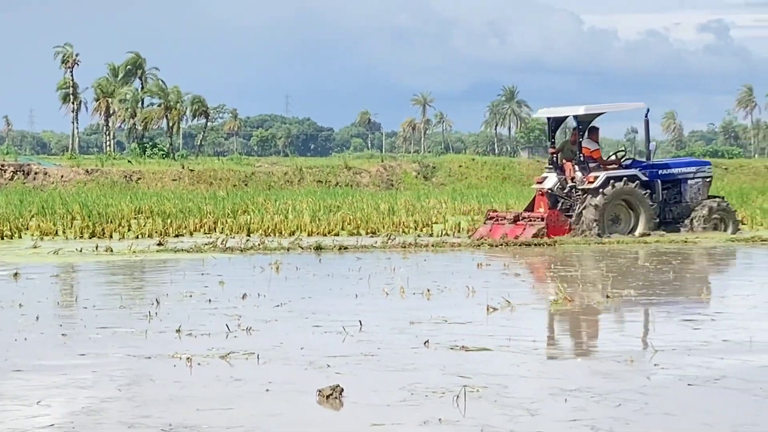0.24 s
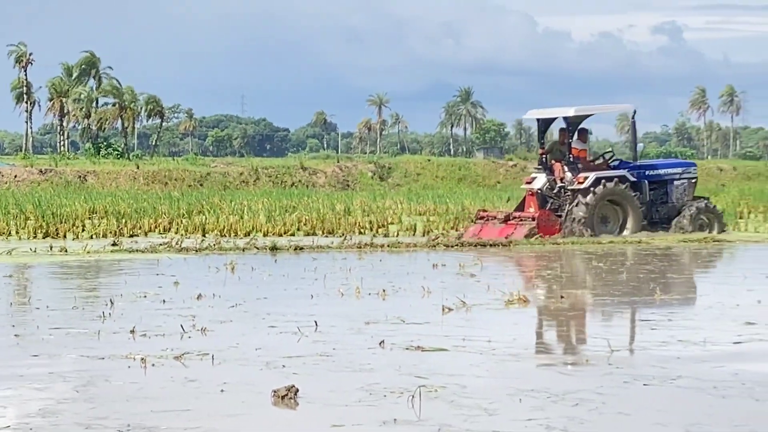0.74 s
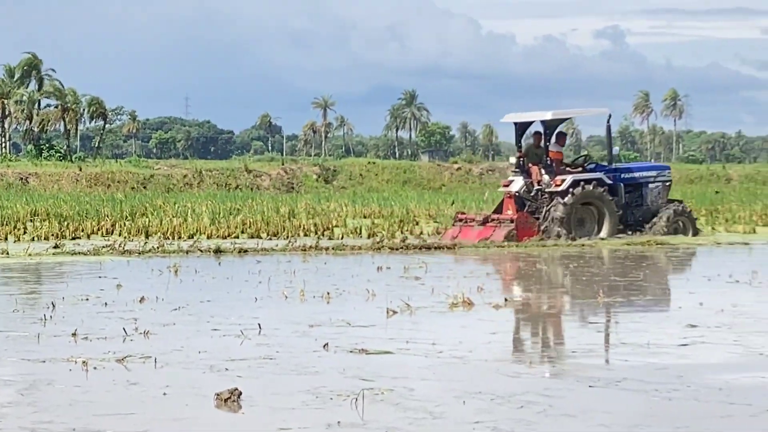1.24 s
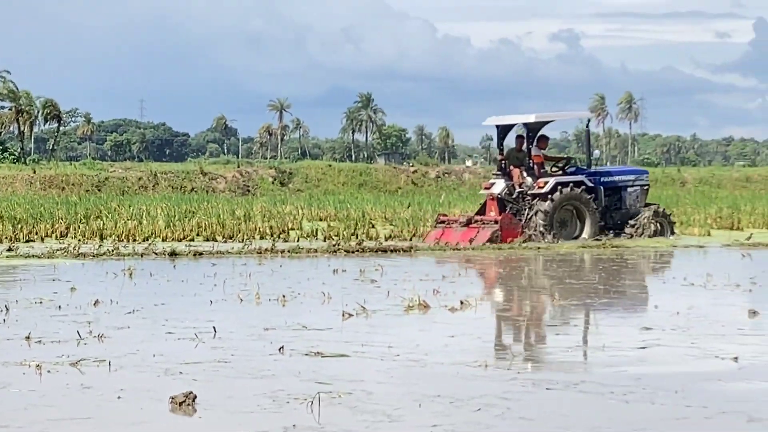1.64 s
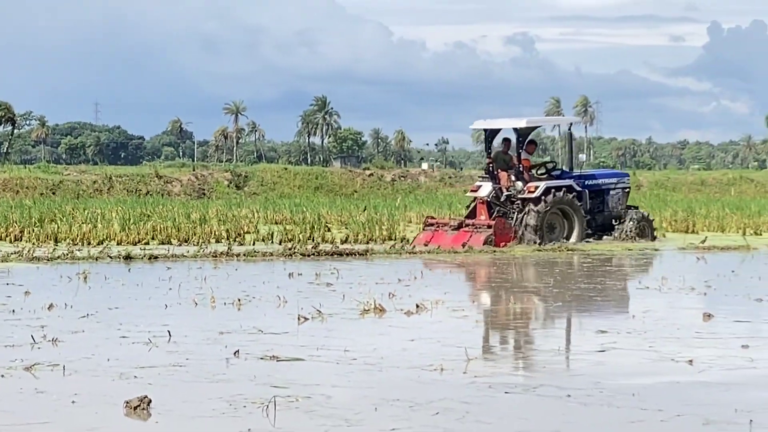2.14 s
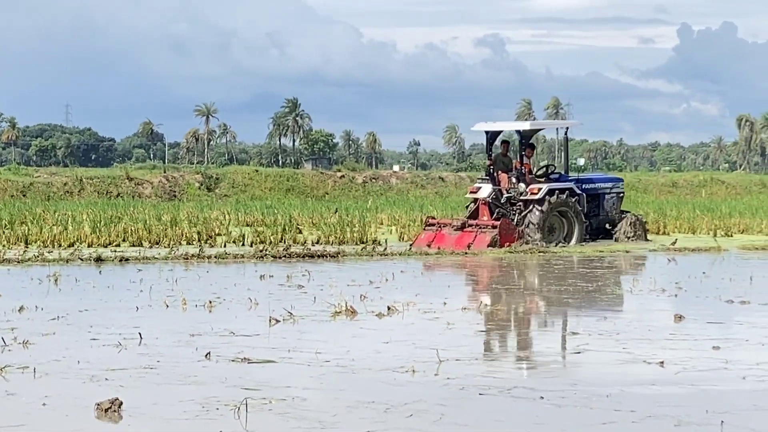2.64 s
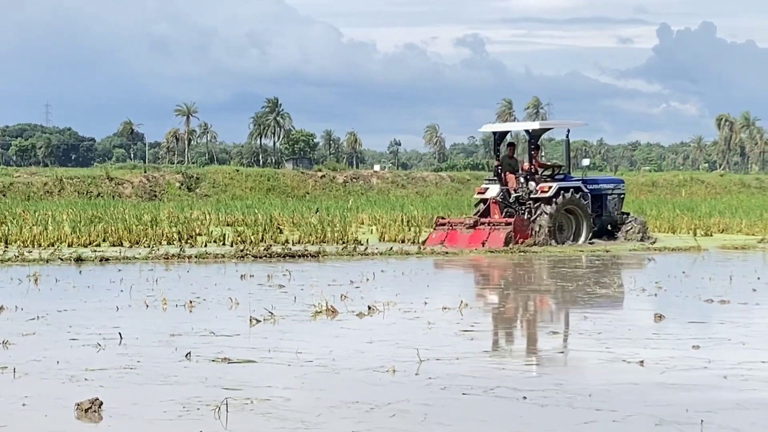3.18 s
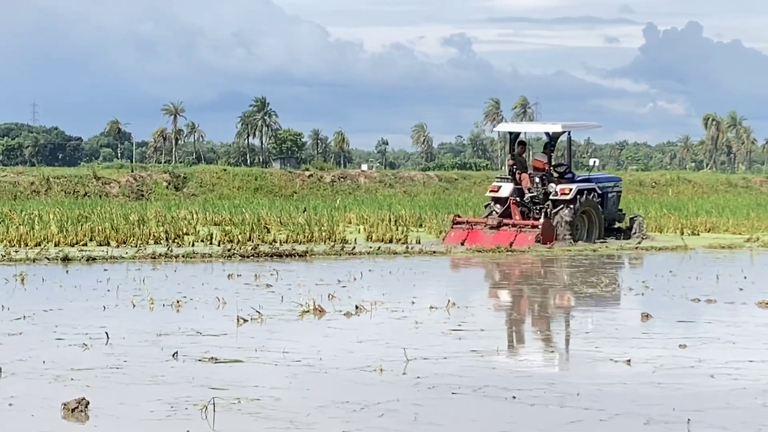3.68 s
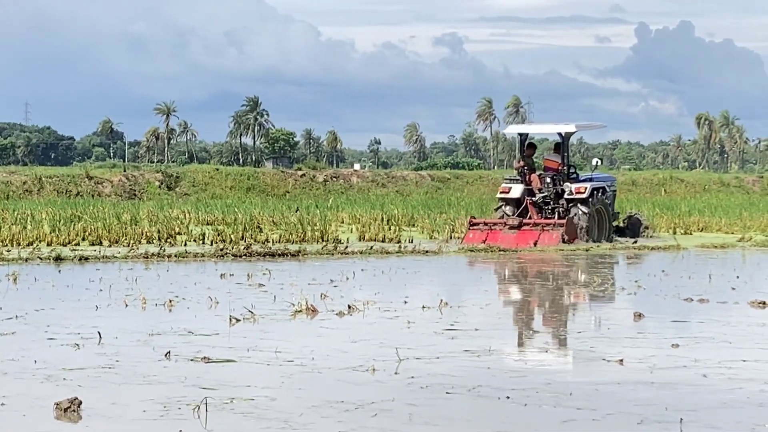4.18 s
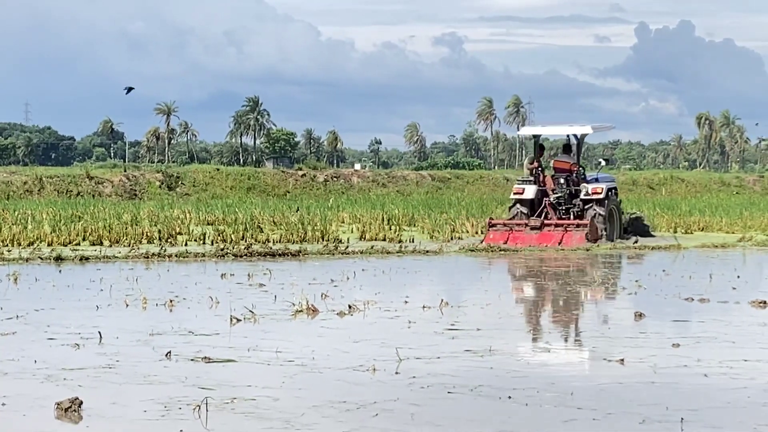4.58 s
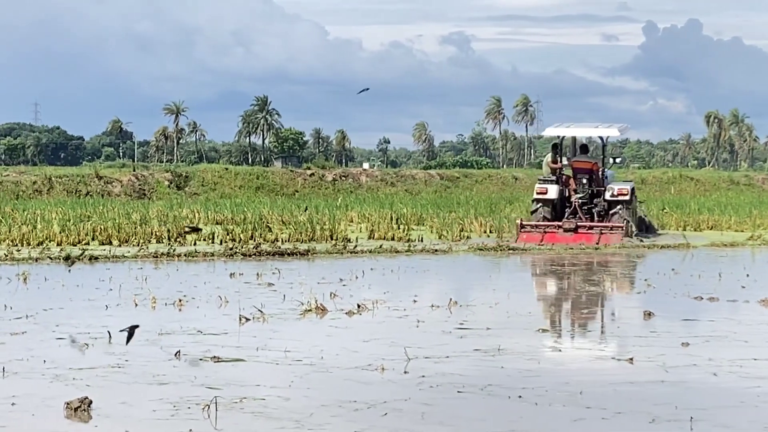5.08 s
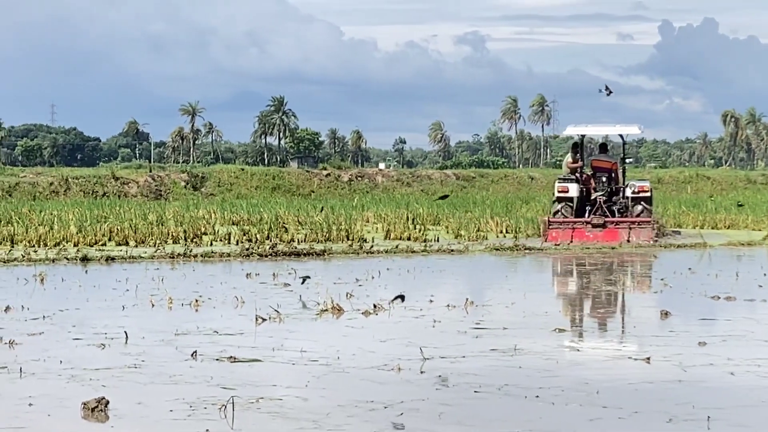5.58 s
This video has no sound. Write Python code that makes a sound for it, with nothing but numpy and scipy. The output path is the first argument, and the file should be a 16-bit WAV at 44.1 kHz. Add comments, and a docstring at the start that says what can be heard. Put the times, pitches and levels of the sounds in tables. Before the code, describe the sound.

A diesel tractor works some way off in a flooded field, with a low, even drone and rapid clatter. Its tiller clanks lightly now and then over a faint hiss of thrown water and mud. A bird gives six short whistles in the first half. A high, pulsing cricket rasp grows louder, then stops near the end. The engine fades slightly as it turns away, heard outdoors through a hand-held stereo microphone.

```python
"""Tractor tilling a flooded field.

A three-cylinder diesel works some way off and turns slowly away. Its exhaust drones on the firing
rate, the block clatters with each firing, the tiller clanks and throws mud and water.
A bird whistles six times; a bush cricket rasps its wings ever louder, then stops.
Heard through two microphone ports on a hand-held device."""
import sys
import numpy as np
from scipy import signal
from scipy.fft import rfft, irfft
from scipy.io import wavfile
from scipy.ndimage import uniform_filter1d

SR = 44100
rng = np.random.default_rng(int(sys.argv[2]) if len(sys.argv) > 2 else 0)


def transcribe(u):
    """Save the signal u as a 16-bit wav file named by the first command-line argument.

    u: samples, shape (n,) or (channels, n), limited to [-1, 1]; the rate is SR.
    q: integer samples, one column per channel.
    """
    v = np.clip(np.atleast_2d(u).T, -1, 1)
    q = np.round(v * 32767).astype(np.int16)
    wavfile.write(sys.argv[1], SR, q)


N = 256662
T = np.arange(N) / SR
HZ = np.maximum(np.arange(N // 2 + 1) * SR / N, 1)


# engine speed: time_s, cycles_per_s
ENGINE_SPEED = [(0.0, 16.108), (0.39, 16.108), (0.78, 16.103), (1.16, 16.103), (1.55, 16.027),
                (1.94, 16.12), (2.33, 16.108), (2.72, 15.968), (3.1, 16.102), (3.49, 16.203),
                (3.88, 16.148), (4.27, 16.028), (4.66, 16.164), (5.04, 15.942), (5.43, 16.013),
                (5.82, 16.015)]

def engine_cycles(first_firing_s=.0127):
    """Running count of four-stroke cycles: two crank turns and three firings each."""
    cycles_per_s, = in_time(ENGINE_SPEED)
    return np.cumsum(cycles_per_s) / SR - first_firing_s * cycles_per_s[0] + 1


# firing orders 1-3: broadside_db, fade_factor
MAIN_ORDERS = [(-27.5, 1.65), (-20.5, 0.96), (-23, .7)]
# firing orders 1-4: wander_db
ORDER_WANDER_DB = [0.88, 0.55, 0.85, 0.71]
# weak exhaust tones: cycle_rate_multiple, level_db (re firing order 2)
MINOR_ORDERS = [(5, -24), (10, -17.5), (11, -18), (15, -23.5), (15.75, -22.5), (18, -27), (21, -20),
                (25, -22.5), (27, -23)]

def exhaust(cycle, fade_db, fourth_db, silencer_lead_rad=1.2):
    """Firing orders add in step to uneven puffs that swing in strength and phase once a crank turn."""
    levels_db = [db + factor * fade_db for db, factor in MAIN_ORDERS] + [fourth_db]
    levels_db = [db + wander_db * drift(2.0) for db, wander_db in zip(levels_db, ORDER_WANDER_DB)]
    firing, crank_rad = 3 * cycle, 4 * np.pi * cycle
    strength = np.interp(firing, np.arange(400), rng.standard_normal(400))
    swing = 1 + 0.18 * np.cos(crank_rad)
    out = from_db(levels_db[0] + 0.52 * drift(9.0)) * np.cos(2 * np.pi * firing + silencer_lead_rad)
    for k, db in enumerate(levels_db[1:], 1):
        lead_rad = 0.025 * np.sin(crank_rad) + .05 * k * drift(15.0)
        out += from_db(db + 0.2 * k * strength) * swing * np.cos(2 * np.pi * (k + 1) * firing + lead_rad)
    for multiple, db in MINOR_ORDERS:
        gain = from_db(levels_db[1] + db + 2.55 * drift(3.4))
        out += gain * np.cos(2 * np.pi * multiple * cycle + .5 * drift(3.3) + rng.uniform(0, 2 * np.pi))
    return np.sqrt(2) * out


def knock(cycle, depth, decay_firings):
    """Envelope that jumps unevenly at each combustion and dies back until the next."""
    firing = 3 * cycle + 0.13
    strength = from_db(2.5 * rng.standard_normal(400))[firing.astype(int)]
    envelope = 1 + depth * strength * np.exp(-(firing % 1) / decay_firings)
    return uniform_filter1d(envelope, size=90)


# noise of block, gears and bonnet: freq_hz, density_db
CLATTER_SPECTRUM = [(24, -34), (45, -10), (70, 0), (170, 4.5), (260, -3.5), (400, -1), (600, -3.5),
                    (1050, -3.5), (1600, -8), (2000, -11.5), (2800, -16.5), (3800, -20.5), (4500, -30.5),
                    (6000, -40.5), (16000, -55)]
# cancellation by the reflection off the water: centre_hz, width_hz, depth
WATER_NOTCHES = [(258, 51, 0.5), (733, 40, 0.67), (887, 175, 0.7), (1383, 234, 0.7), (2360, 260, 0.48)]
# bonnet and gearbox panels: centre_hz, width_hz, added_gain
PANEL_MODES = [(260, 9.8, 0.94), (333, 34, 1), (422, 14, 0.19), (490, 40, 0.5), (832, 20, 0.46),
               (990, 25, 0.52), (1060, 18, 0.5), (1230, 96, 0.21), (1540, 60, 0.15), (1690, 74, 0.57),
               (1910, 110, 0.25), (2640, 97, 0.13), (3825, 71, 0.73)]

def clatter(cycle, tilt_db):
    """Block and gear noise, beaten by the firings, ringing in panels, combed by the water's reflection."""
    colour = from_db(at_hz(CLATTER_SPECTRUM))
    for hz, width_hz, depth in WATER_NOTCHES:
        colour *= 1 - depth / (1 + (2 * (HZ - hz) / width_hz) ** 2)
    for hz, width_hz, gain in PANEL_MODES:
        colour *= 1 + gain / (1 + (2 * (HZ - hz) / width_hz) ** 2)
    noise = rng.standard_normal((2, N)) * knock(cycle, depth=0.5, decay_firings=0.21)
    return flicker(spread(noise, colour), together_db=0.23, own_db=1.02, low_hz=164, tilt_db=tilt_db)


# gear whine: time_s, level_db
WHINE_LEVEL = [(0, -47), (2, -48), (3.2, -52), (4, -60), (5.82, -64)]

def gear_whine(mesh_hz=1545):
    """A thin, wavering tone of meshing teeth."""
    db, = in_time(WHINE_LEVEL)
    gain = from_db(db + drift(5.0))
    pitch_hz = mesh_hz + 3.52 * drift(3.07)
    return gain * np.sin(2 * np.pi * np.cumsum(pitch_hz) / SR)


# blades hitting something hard: start_s, level_db
BLADE_HITS = [(0.5644, -32), (1.4994, -35), (2.2598, -38), (4.3544, -37), (4.4164, -33), (4.7054, -32),
              (5.2, -29.5), (5.4104, -30), (5.5024, -34)]
# tiller hood: centre_hz, width_hz, level_db
HOOD_MODES = [(1104, 350, 0.5), (1930, 310, 1), (3140, 950, -2.5)]

def tiller_clanks():
    """Each blade hit rattles briefly through the hood's broad resonances."""
    rings = 0
    for hz, width_hz, db in HOOD_MODES:
        gain = from_db(db + 2 * drift(7.4))
        ring = resonate(rng.standard_normal(N), hz, width_hz)
        rings += gain * unit_rms(resonate(ring, hz, width_hz))
    return from_db(-6) * impacts(BLADE_HITS, attack_s=0.0018) * rings


# thrown water: freq_hz, density_db
SPLASH_SPECTRUM = [(1500, -2), (3000, -4), (4500, 5), (6000, -3), (8000, 3), (10500, 0), (13000, -3),
                   (15100, -7), (15250, -8)]

def splash(cycle, drops_per_s=3000):
    """Dense drops of uneven size over spray hiss; exhaust jet hiss pulses within it."""
    sizes = from_db(3.0 * np.minimum(rng.exponential(1, (2, N)), 5))
    signs = rng.choice([-1, 1], (2, N))
    lands = rng.random((2, N)) < drops_per_s * from_db(2.0 * drift(12.0)) / SR
    drops = .5 * unit_rms(sizes * signs * lands)
    hiss = rng.standard_normal((2, N)) * knock(cycle, depth=1.0, decay_firings=0.12)
    pair = spread(drops + hiss, from_db(at_hz(SPLASH_SPECTRUM)))
    return flicker(pair, together_db=.35, own_db=.75, low_hz=1500)


# clods landing: start_s, level_db
CLODS = [(1.72, -35), (4.7087, -39), (5.6845, -43)]

def mud_splats():
    """Each clod hits the water with a short, bright noise burst."""
    bursts = impacts(CLODS, attack_s=0.0014) * rng.standard_normal(N)
    return band_pass(bursts, 2500, 12000, order=1)


# rising calls: start_s, rise_s, top_hz, level_db, hold_s
RISING_CALLS = [(.87, .045, 3830, -43.5, 0), (1.262, .071, 3860, -43.5, .052), (1.69, .042, 4020, -45, 0)]
# upward glide: time_share, span_share_below_top, gain_db
RISE_SHAPE = [(0, 1, -8), (.35, .45, -2.5), (1, 0, 0)]
# downward flick: time_share, span_share_below_top, gain_db
FLICK_SHAPE = [(.3, .47, -5), (.75, .88, 2), (1, 1, -5)]

def rising_notes(rise_hz=350, flick_s=.026, flick_end_hz=2420):
    """Curves (time_s, pitch_hz, level_db) of calls that rise and flick down; the top may sound on."""
    for start_s, rise_s, top_hz, db, hold_s in RISING_CALLS:
        top_s = start_s + rise_s
        rise = [(start_s + share * rise_s, top_hz - below * rise_hz, db + gain_db)
                for share, below, gain_db in RISE_SHAPE]
        flick = [(top_s + share * flick_s, top_hz - below * (top_hz - flick_end_hz), db + gain_db)
                 for share, below, gain_db in FLICK_SHAPE]
        yield rise + flick
        if hold_s:
            yield [(top_s, top_hz, db - 3.5), (top_s + hold_s, top_hz, db - 7.5)]


# falling whistles: start_s, length_s, settled_hz, level_db, fade_db_per_s
FALLING_CALLS = [(2.254, 0.066, 2820, -37.5, 10), (2.687, .075, 2735, -37, 110),
                 (3.163, .036, 2720, -36, 400)]

def falling_notes(fall_hz=448, fall_s=0.0073, sag_hz_per_s=1100, loudest_s=0.01):
    """Curves of whistles that drop fast, then sag."""
    for start_s, length_s, settled_hz, db, fade_db_per_s in FALLING_CALLS:
        age_s = np.linspace(0, length_s, num=15)
        pitch_hz = settled_hz + fall_hz * np.exp(-age_s / fall_s) - sag_hz_per_s * age_s
        yield np.transpose([start_s + age_s, pitch_hz, db - fade_db_per_s * np.abs(age_s - loudest_s)])


# bird pips: middle_s, length_s, pitch_hz, level_db
PIP_CALLS = [(2.232, .018, 3620, -46), (2.66, .018, 3700, -50), (3.108, .012, 3580, -47),
             (3.123, .012, 4200, -47), (3.13, .016, 5000, -52), (3.135, .01, 3590, -39),
             (3.219, .034, 2645, -39), (4.552, .022, 4500, -51)]

def pip_notes(drop_hz=170, edge_db=-8):
    """Curves of short falling pips, loudest in the middle."""
    for middle_s, length_s, hz, db in PIP_CALLS:
        yield [(middle_s + side * length_s / 2, hz - side * drop_hz / 2, db + abs(side) * edge_db)
               for side in (-1, 0, 1)]


def bird():
    """Gliding near-sines; loud, high notes carry a faint octave; the far bank adds two echoes."""
    song = np.zeros(N)
    for note in [*rising_notes(), *falling_notes(), *pip_notes()]:
        hz, db = in_time(note)
        gate = np.clip(np.minimum(T - note[0][0], note[-1][0] - T) / 0.0015, 0, 1)
        phase_rad = 2 * np.pi * np.cumsum(hz) / SR
        octave_gain = from_db(db + 29) * np.clip((hz - 3500) / 300, 0, 1)
        song += gate * from_db(db) * (np.sin(phase_rad) + octave_gain * np.sin(2 * phase_rad))
    song *= np.sqrt(2) * from_db(2.5 * drift(70.0))
    echoes = from_db(-22) * np.interp(T - .011, T, song) + from_db(-15) * np.interp(T - .027, T, song)
    return song + echoes


# cricket's effort: time_s, level_db
RASP_EFFORT = [(0, -59), (1.6, -55), (2.6, -48.5), (3.9, -42.5), (4.9, -41)]
FULL_EFFORT_DB = -41

def rasps(last_s=4.901, period_s=.1073, drag_s=.005):
    """Rows (end_s, level_db), counted back from the last; the pace drags late, faint rasps are uneven."""
    k = np.arange(45)
    gaps_s = period_s + drag_s * np.exp(-k / 2.5)
    end_s = last_s - np.cumsum(gaps_s) + gaps_s[0]
    db = np.interp(end_s, *np.transpose(RASP_EFFORT))
    scatter_db = 0.11 * (FULL_EFFORT_DB - db) * rng.standard_normal(len(k))
    return np.transpose([end_s, db + scatter_db])


# closing and opening stroke: ring_hz, width_hz, level_db, swell_db_per_s, extra_db_per_effort_db
WING_STROKES = [(9550, 380, 0, 130, .6), (8850, 450, -7.5, 50, -.5)]

def cricket(stroke_hz=140):
    """Alternating strokes ring the wing; each rasp swells and breaks off; effort brightens it."""
    stroke = np.cumsum(stroke_hz * (1 + 0.033 * drift(25.0))) / SR
    out, played = 0, rasps()
    for k, (hz, width_hz, wing_db, swell_db_per_s, effort_slope) in enumerate(WING_STROKES):
        envelope = np.zeros(N)
        for end_s, db in played:
            left_s = end_s + .006 - T
            gate = np.clip(np.minimum(left_s / 0.018, (.105 - left_s) / 0.038), 0, 1)
            top_db = db + effort_slope * (db - FULL_EFFORT_DB)
            envelope += from_db(top_db - swell_db_per_s * left_s.clip(0, 1)) * gate
        contact = np.exp(-(((stroke + k / 2) % 1 - .5) / .15) ** 2)
        ring = resonate(rng.standard_normal(N) * contact, hz, width_hz)
        out += from_db(wing_db) * envelope * unit_rms(band_pass(ring, 8250, 10000, order=3))
    return out


def from_db(db):
    """Decibels to gain."""
    return 10 ** (np.asarray(db) / 20)


def unit_rms(x):
    """Scale to rms 1."""
    return x / np.sqrt(np.mean(x ** 2) + 1e-20)


def in_time(rows):
    """Each column after time_s, one value a sample."""
    time_s, *columns = np.transpose(rows)
    return [np.interp(T, time_s, column) for column in columns]


def at_hz(rows):
    """Rows (freq_hz, value) read at every FFT bin on a log-frequency axis."""
    hz, values = np.transpose(rows)
    return np.interp(np.log(HZ), np.log(hz), values)


def drift(corner_hz):
    """Random wander of rms 1: noise at every 40th sample through a double one-pole low-pass."""
    pole = np.exp(-80 * np.pi * corner_hz / SR)
    slow = signal.lfilter([1], [1, -2 * pole, pole * pole], rng.standard_normal(N // 40 + 2002))[2000:]
    return np.interp(np.arange(N) / 40, np.arange(len(slow)), unit_rms(slow))


def impacts(hits, attack_s, decay_s=0.012):
    """Envelope with a fast rise and an exponential decay for each hit."""
    envelope = np.zeros(N)
    for start_s, db in hits:
        age_s = np.maximum(T - start_s, 0)
        envelope += from_db(db) * np.exp(-age_s / decay_s) * (1 - np.exp(-age_s / attack_s))
    return envelope


def resonate(x, hz, width_hz):
    """Two-pole resonance, peak gain 1."""
    r = np.exp(-np.pi * width_hz / SR)
    feedback = [1, -2 * r * np.cos(2 * np.pi * hz / SR), r * r]
    return signal.lfilter([(1 - r * r) / 2, 0, (r * r - 1) / 2], feedback, x)


def band_pass(x, low_hz, high_hz, order):
    """Flat-topped band filter."""
    return signal.sosfilt(signal.butter(order, [low_hz, high_hz], "band", fs=SR, output="sos"), x)


def flicker(pair, together_db, own_db, low_hz, tilt_db=0):
    """Six octave bands swell together slowly and flicker on their own; tilt_db is per octave."""
    spectrum, octave, swell = rfft(pair), np.log2(HZ / low_hz), drift(2.6)
    out = 0
    for k in range(6):
        band = irfft(spectrum * np.interp(octave, np.arange(6), np.arange(6) == k), N)
        out += band * from_db(together_db * swell + own_db * drift(23.0) + tilt_db * (k - 3))
    return out


# left-right likeness: freq_hz, coherence
PORT_COHERENCE = [(100, 0.94), (450, 1), (690, 0.85), (800, 0.67), (1000, 0.94), (1400, 0.83), (1800, 0.83),
                  (2400, 0.55), (4000, 0.78), (5300, 0.87), (6500, 0.9), (8200, 0.4), (9200, 1),
                  (10200, 0.95), (15000, 0.8)]

def spread(noise_pair, colour):
    """Colour a source for both ports at rms 1; the right one hears a share of scattered sound."""
    coherence = at_hz(PORT_COHERENCE)
    direct, scattered = rfft(noise_pair)
    right = coherence * direct + np.sqrt(1 - coherence ** 2) * scattered
    return unit_rms(irfft(np.array([direct, right]) * colour, N))


# tractor turning away: time_s, engine_fade_db, splash_db, fourth_order_db, clatter_tilt_db_per_octave
TURN_AWAY = [(0, 0, -45, -30.5, -1), (.6, -.5, -45.5, -29.5, 0), (1.4, 0, -44, -28.5, 0),
             (2.0, -1.4, -45, -28.5, 0), (2.5, -1.55, -46.5, -29.5, 0), (3.8, -2.5, -48, -28, 0),
             (4.3, -2.5, -48, -29, -.5), (4.8, -3.5, -51, -34.5, -.8), (5.3, -4, -52, -33.5, 0.15),
             (5.82, -4, -51, -34.5, 0.7)]

def scene():
    """The turning tractor, the cricket and the bird, slightly left, at the two ports."""
    cycle = engine_cycles()
    fade_db, splash_db, fourth_db, tilt_db = in_time(TURN_AWAY)
    centre = exhaust(cycle, fade_db, fourth_db) + gear_whine() + cricket() + mud_splats() + tiller_clanks()
    block = from_db(-27.5 + 1.086 * fade_db) * clatter(cycle, tilt_db)
    water = from_db(splash_db) * splash(cycle)
    return centre + block + water + bird() * from_db([[1.5], [0]])


# right port's colour: freq_hz, gain_db
RIGHT_PORT_GAIN = [(40, -2.5), (100, -3), (500, -3), (690, -6), (800, -2.5), (1000, -2), (1600, -4),
                   (2100, -4), (2900, -4), (3800, -4), (4400, 2), (6000, 1)]
# right port's phase, turning a full cycle at the case resonance: freq_hz, lead_rad
RIGHT_PORT_PHASE = [(500, -.15), (620, -.8), (690, -2.4), (730, -3.8), (800, -4.6), (900, -5.65),
                    (2500, -5.8), (3300, -6.8), (3800, -5.5), (5000, -5.3), (6800, -6.28), (15800, 6.28)]

def record(dry, cutoff_hz=15450):
    """The right port has its own colour and phase; the device cuts the top steeply."""
    hz, lead_rad = np.transpose([(0, 0)] + RIGHT_PORT_PHASE)
    response = from_db(at_hz(RIGHT_PORT_GAIN)) * np.exp(1j * np.interp(HZ, hz, lead_rad))
    pair = np.array([dry[0], irfft(rfft(dry[1]) * response, N)])
    return signal.sosfilt(signal.ellip(12, .5, 75, cutoff_hz, fs=SR, output="sos"), pair)


dry = scene()
out = record(dry)
transcribe(out)
```